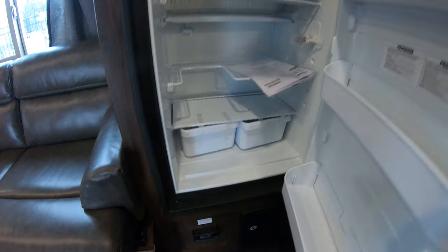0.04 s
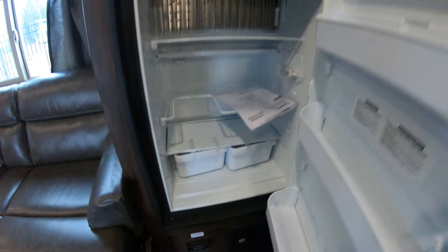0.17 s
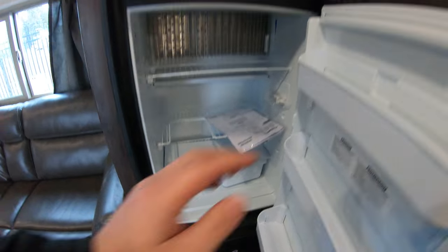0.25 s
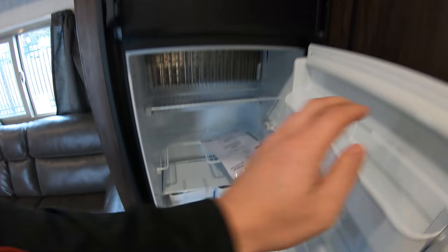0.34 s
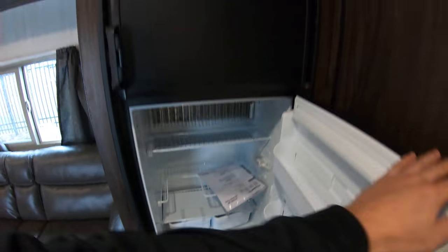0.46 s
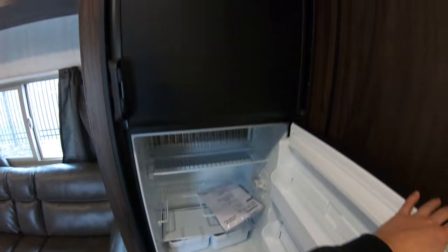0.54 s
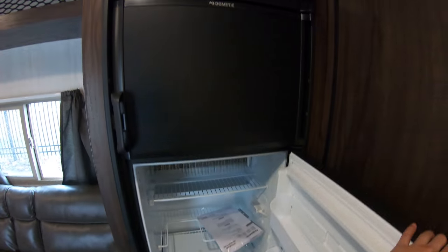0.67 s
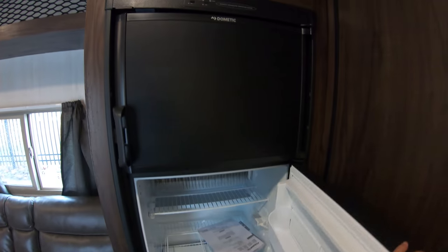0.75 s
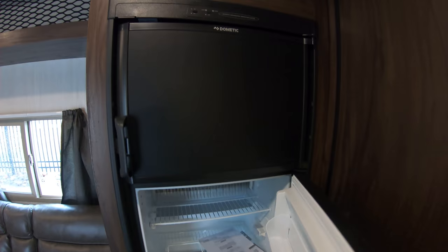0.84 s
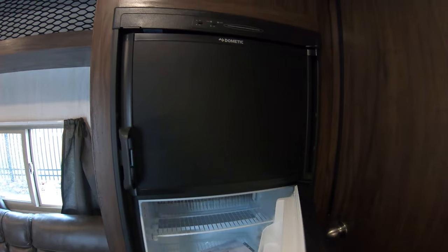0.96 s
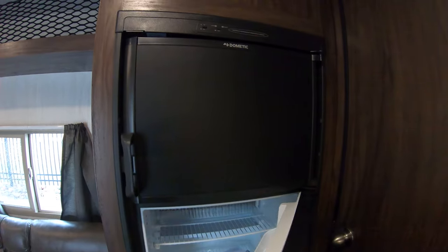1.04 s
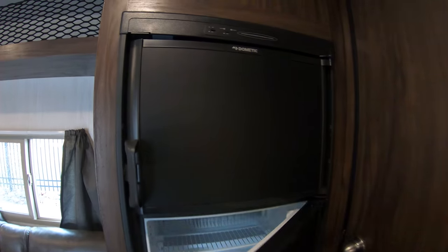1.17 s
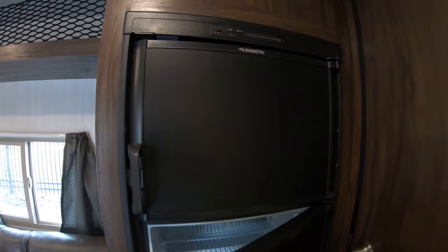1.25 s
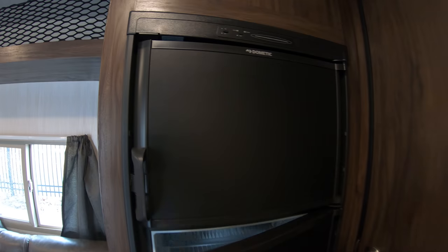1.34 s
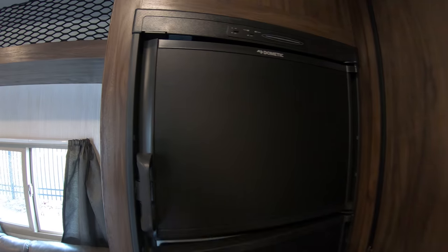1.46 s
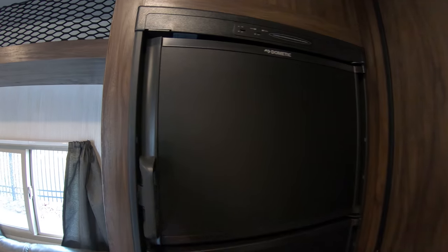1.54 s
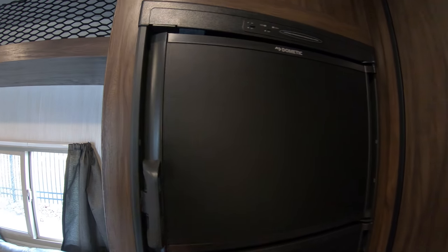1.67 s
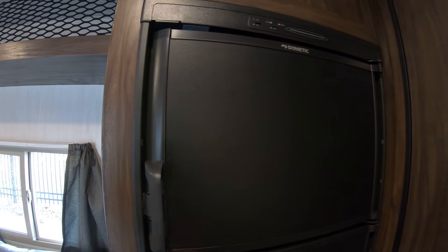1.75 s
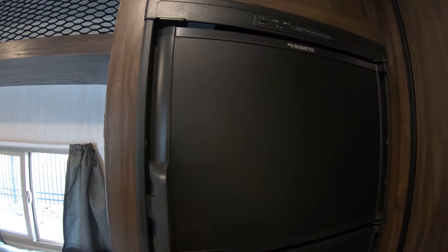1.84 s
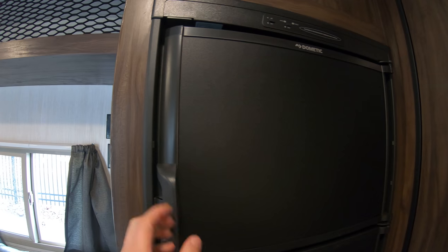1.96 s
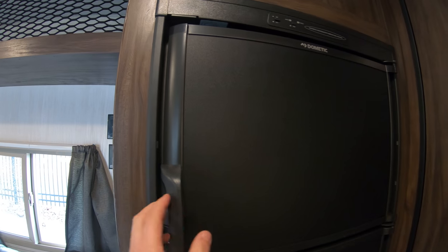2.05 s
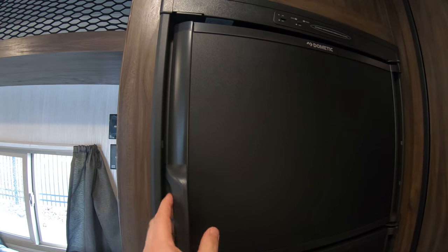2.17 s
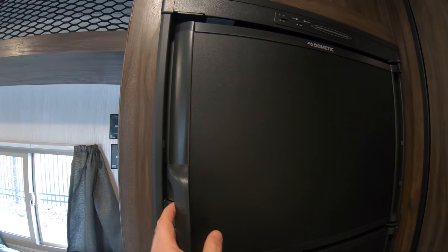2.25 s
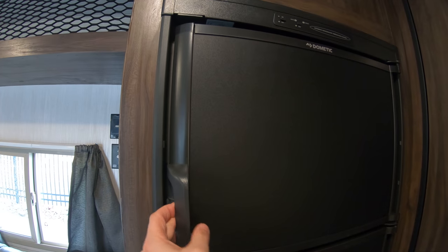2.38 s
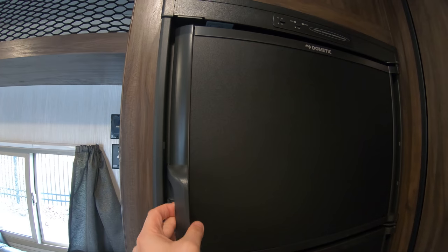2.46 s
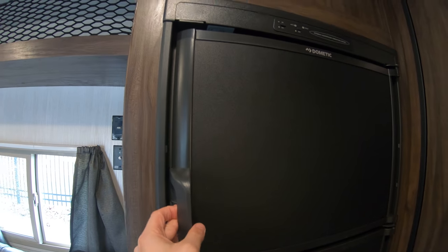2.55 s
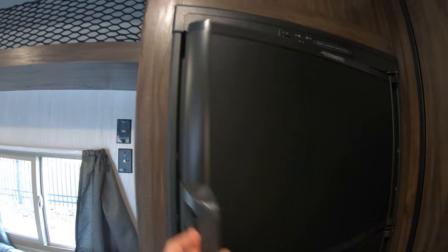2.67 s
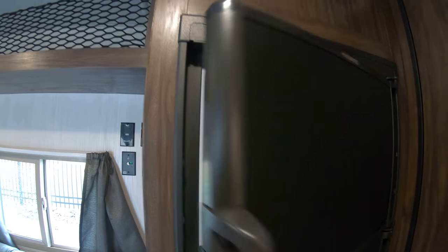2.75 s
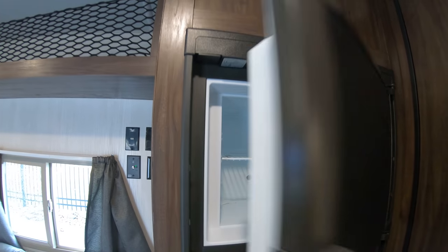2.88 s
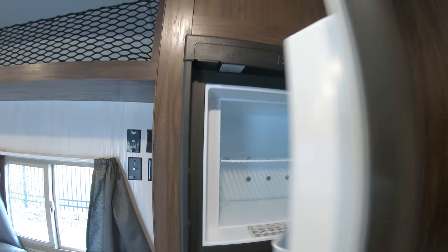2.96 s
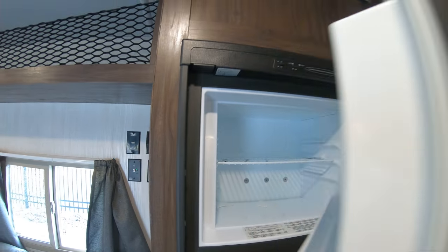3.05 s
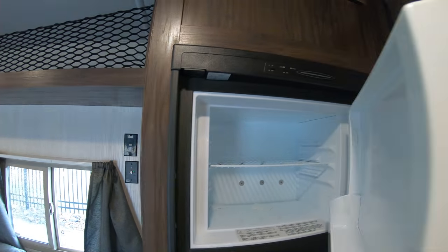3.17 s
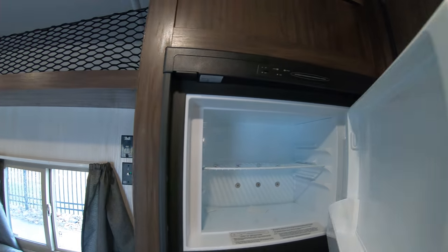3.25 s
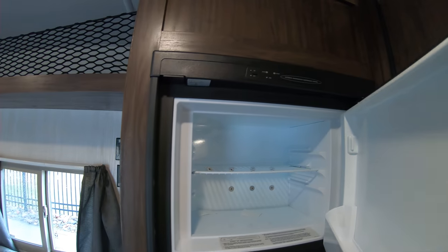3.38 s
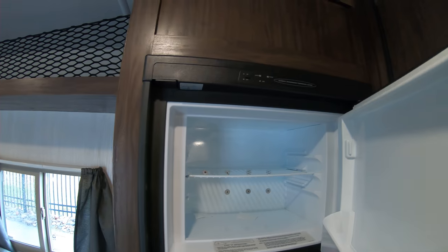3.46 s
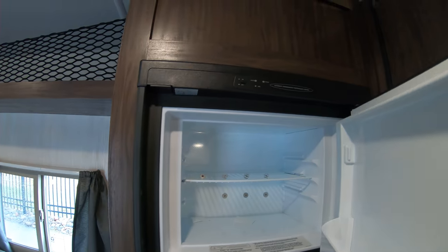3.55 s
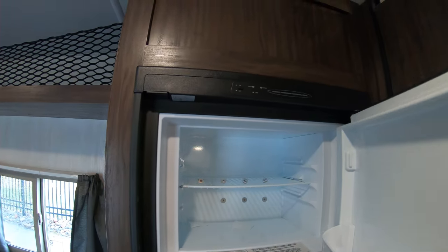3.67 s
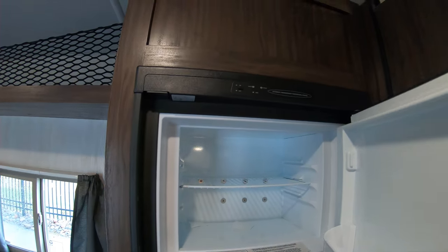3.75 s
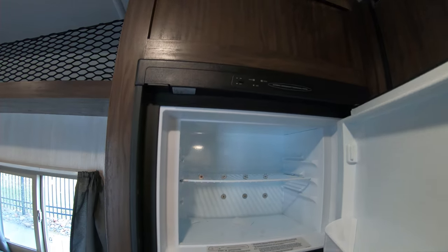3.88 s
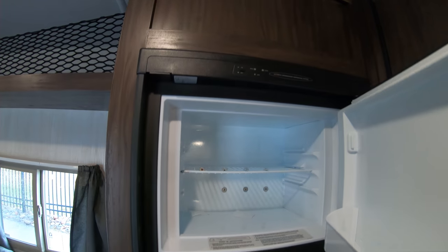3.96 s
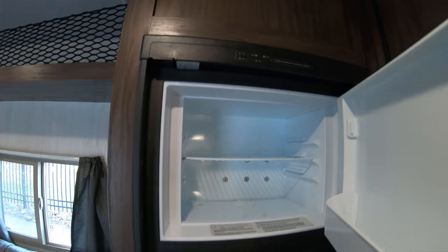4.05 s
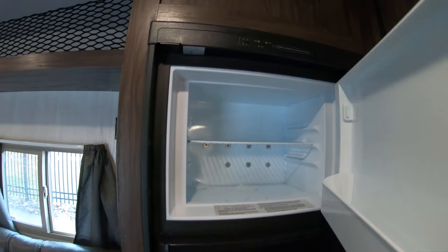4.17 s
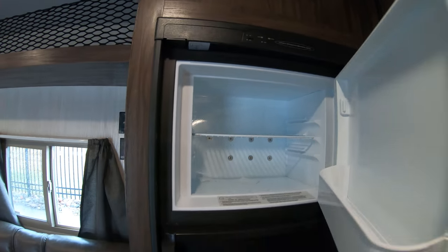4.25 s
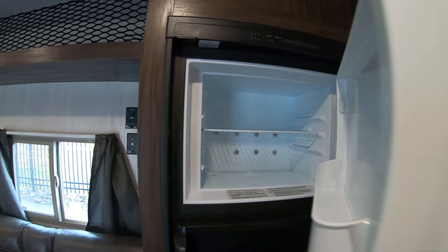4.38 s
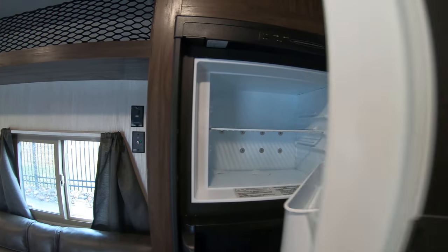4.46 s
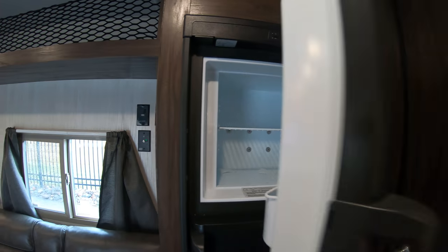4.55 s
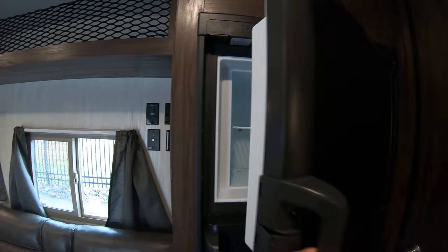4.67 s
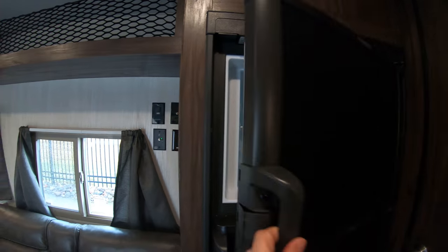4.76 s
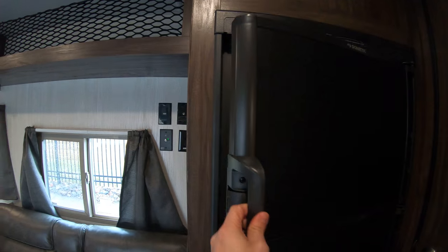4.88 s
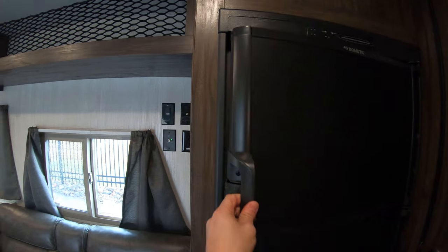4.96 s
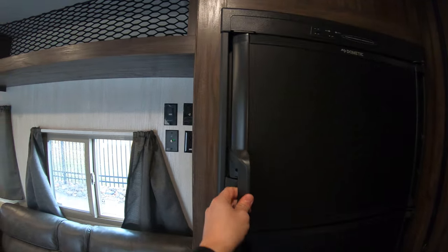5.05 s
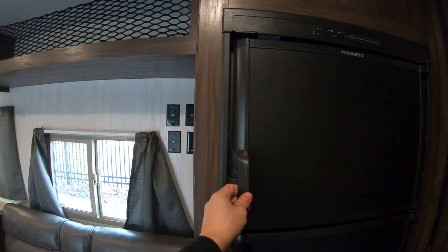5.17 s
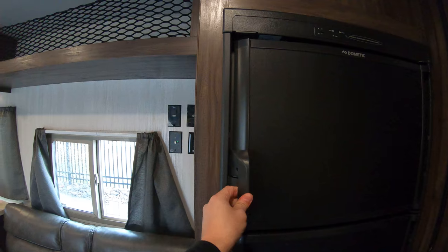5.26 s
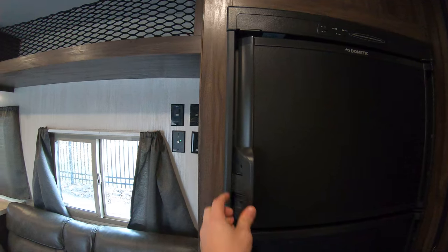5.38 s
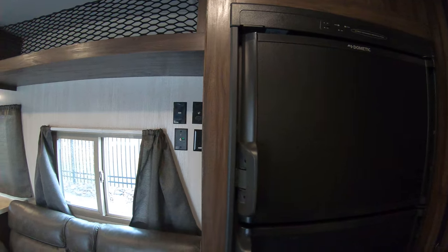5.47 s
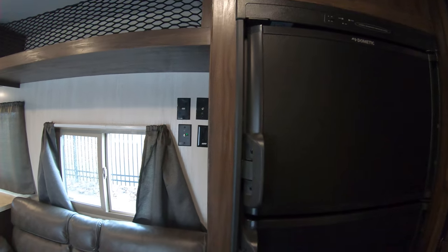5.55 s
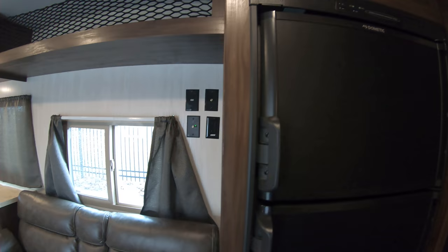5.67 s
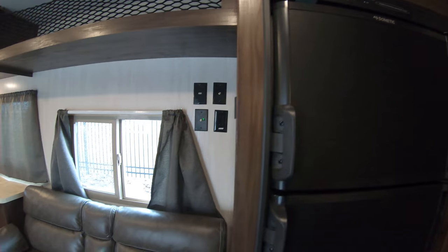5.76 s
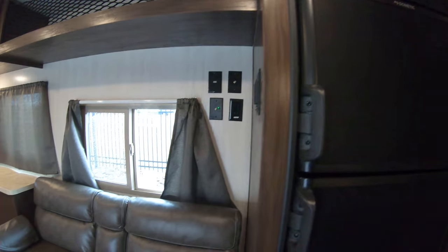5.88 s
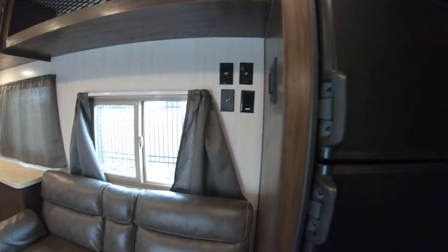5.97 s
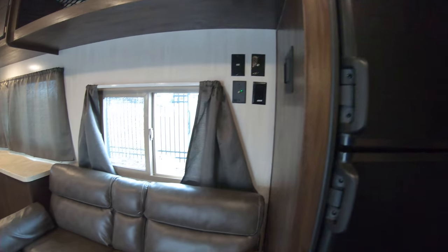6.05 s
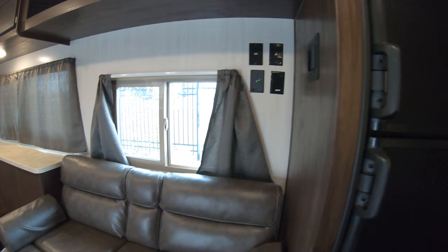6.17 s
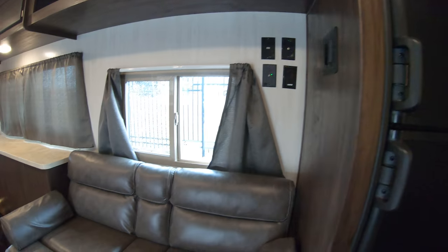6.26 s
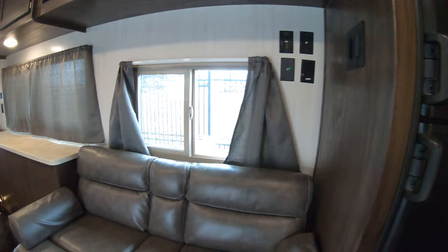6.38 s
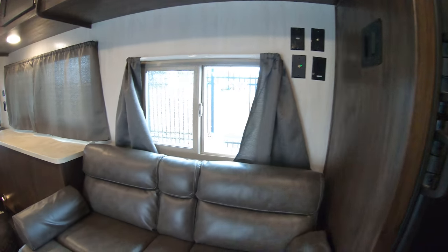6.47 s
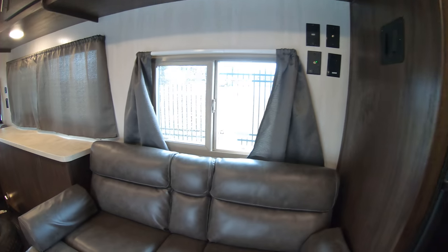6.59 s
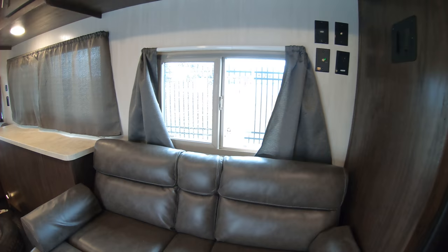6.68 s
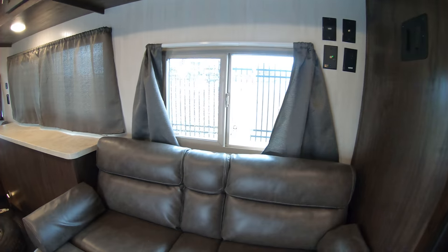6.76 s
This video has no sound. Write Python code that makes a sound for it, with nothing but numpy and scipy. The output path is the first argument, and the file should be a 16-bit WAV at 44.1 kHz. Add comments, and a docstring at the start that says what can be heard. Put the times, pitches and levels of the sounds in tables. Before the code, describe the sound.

In a small panelled camper, a fridge door thuds shut with a rattle, then a freezer door clicks open and knocks shut over low engine rumble.

```python
"""Inside a parked camper, in a small panelled room, the door of a built-in refrigerator is swung shut.
The freezer door above it is unlatched, pulled off its gasket and pushed shut again. Each closing is noise
blows, ringing modes and a low thump; clicks and rubs are shaped noise with a resonance. Outside, an engine
of summed orders speeds up under a noise rumble; sleeves rustle near the microphone over a faint whine."""
import sys
import numpy as np
from scipy import signal
from scipy.fft import rfft, irfft, next_fast_len
from scipy.io import wavfile
from scipy.ndimage import uniform_filter1d, minimum_filter1d, map_coordinates

SR = 44100
rng = np.random.default_rng(int(sys.argv[2]) if len(sys.argv) > 2 else 0)


def master(y):
    """Save y as 16-bit WAV."""
    cut = np.clip(np.atleast_2d(y).T, -1, 1)
    pcm = np.round(cut * 32767)  # scale
    wavfile.write(sys.argv[1], SR, pcm.astype(np.int16))


N = 300850

# rumble from outdoors: (frequency [Hz], density [dB per Hz])
RUMBLE_SPECTRUM = [(20, -1.5), (42, -0.5), (60, 1), (90, 2.5), (140, -3), (175, -6), (230, -13), (300, -26),
                   (400, -30), (550, -75.5), (900, -109.5)]
# swells of the rumble: (time of peak [s], level [dB], half-width [s])
RUMBLE_SURGES = [(.6, -50.5, 0.15), (2.0, -50, 0.48), (3.65, -45, 0.54), (6.4, -43.5, 0.45)]
RUMBLE_DB = -44  # level between the swells, before it wavers
# hiss of the room: (frequency [Hz], density [dB per Hz])
HISS_SPECTRUM = [(200, -5), (470, 11), (560, -2), (720, 11), (1000, 1), (1100, -4), (1250, 4), (1600, 3.5),
                 (2400, 1), (4200, -4.5), (6300, -1), (7500, -11.5), (9500, -23.5), (15000, -38)]
# faint electric whine that comes and goes: (start [s], end [s], level [dB])
WHINE_SPANS = [(.1, 0.96, -70), (1.12, 3.302, -66), (3.698, 6.994, -74)]
WHINE_HZ = 2001
# thin hums: (frequency [Hz], level [dB], width of the phase wander [Hz])
HUM_TONES = [(84.9, -46, 2.162), (136.7, -46.5, 3), (6320, -76, 36)]
# thin airy tones: (start [s], end [s], frequency [Hz], level [dB])
AIRY_TONES = [(1.9, 3.0, 1232, -73), (5.35, 6.35, 1176, -73)]

# loudness of the engine outside, before its offset and fade-in: (time [s], level [dB])
ENGINE_LEVEL = [(3.2, -37.5), (3.57, -31.5), (3.96, -36), (5.1, -31.5), (5.68, -36), (6.31, -37.5),
                (6.82, -37.5)]
# engine orders, before the cabin: (multiple of the cycle rate, level [dB])
ENGINE_ORDERS = [(3, -22), (4, -20), (5, -5), (6, -16), (7, -18.5), (8, -4.5), (9, -7), (10, -27.5),
                 (11, -16), (12, -18.5), (14, -22), (15, -25.5), (17, -27.5)]
# how the cabin passes a tone from outside: (frequency [Hz], gain [dB])
CABIN_RESPONSE = [(35, -8), (57, 4), (70, -3), (76, 0), (90, -0.5), (120, 1.5), (150, -1.5), (260, -1)]
# the engine speeds up once, along an S-curve: cycles per second before and after, middle, time constant
IDLE_HZ, RUNNING_HZ, REV_S, REV_TAU_S = 8.2, 15.05, 3.46, .29
ENGINE_DB, ENGINE_IN_S, ENGINE_IN_DB_PER_S = -0.5, 3.26, 45.5  # offset; end and slope of its fade-in

# arm movements that rustle a sleeve: (time of peak [s], level [dB], half-width [s])
ARM_REACHES = [(.72, -63.5, 0.52), (2.9, -66, 0.54), (4.65, -64.5, 0.3), (5.87, -66, .08),
               (6.22, -61.5, 0.15), (6.57, -57.5, 0.27)]
SLEEVE_REST_DB = -73  # rustle between the movements
# rustling sleeve: (frequency [Hz], density [dB per Hz])
CLOTH_SPECTRUM = [(300, -2.5), (1500, 3.5), (4000, 4.5), (6000, 9), (7200, 3.5), (8500, -8), (10000, -22.5),
                  (15000, -38.5)]
# soft bumps of a door being handled: (time [s], level [dB], frequency [Hz], decay by 60 dB [s])
DOOR_BUMPS = [(0.637, -29, 124, 0.28), (1.325, -22.5, 84, 0.24), (1.331, -49, 281, 0.22),
              (2.061, -51.5, 374, 0.22), (2.299, -40, 90.6, 0.69), (2.665, -28.5, 41.5, 0.68),
              (5.173, -33.5, 803, 0.064), (6.269, -36, 237, 0.19)]
SQUEAK_S, SQUEAK_WIDTH_S, SQUEAK_DB = .505, 0.0076, -43.5  # one tiny squeak
SQUEAK_HZ, SQUEAK_RISE_HZ, SQUEAK_JITTER_HZ = 600, 227, 110.4  # its pitch rises with the pressure

# gasket and hand rubbing on the doors:
# (time of peak [s], level [dB], swell [s], resonance [Hz], resonance gain [dB])
DOOR_RUBS = [(1.332, -52.5, .012, 5300, 7), (1.391, -54, 0.011, 5100, 2), (1.606, -45.5, .03, 2360, 6.5),
             (2.06, -40.5, 0.01, 5800, 14), (2.092, -45.5, 0.013, 2600, 14),
             (2.294, -50.5, 0.0097, 1580, 15), (2.66, -44.5, 0.01, 5400, -2), (2.802, -57.5, .016, 5000, 0),
             (2.882, -58.5, 0.021, 5470, 0), (2.95, -48.5, 0.015, 3240, 15),
             (3.136, -55.5, .012, 2940, 12.5), (6.281, -52, 0.012, 2000, 11.5),
             (6.502, -55.5, .014, 5000, 1)]
# rubbed gasket: (frequency [Hz], density [dB per Hz])
RUBBER_SPECTRUM = [(150, -18), (380, -3), (550, -8.5), (780, -1.5), (1100, -7.5), (1450, -1.5),
                   (3000, -7.5), (5800, -2.5), (7000, -9), (8500, -21), (9500, -34.5), (15000, -48.5)]
RUB_FADE = 1.45  # fade time over swell time

# light clicks of handle, latch and hinges:
# (time [s], level [dB], decay by 60 dB [s], resonance [Hz], resonance gain [dB])
PLASTIC_CLICKS = [(.363, -44.5, 0.019, 5700, 14), (.603, -26, 0.046, 5330, 13),
                  (.612, -32.5, 0.06, 1950, -2), (.655, -28, 0.045, 3950, 7),
                  (.912, -36.5, 0.027, 5840, 13), (1.878, -45, .04, 5500, -5),
                  (2.041, -47.5, 0.049, 5800, 7), (2.059, -41.5, 0.046, 2580, 25),
                  (2.101, -40.5, 0.037, 1450, 25), (2.300, -36.5, 0.044, 1920, 17),
                  (2.312, -33.5, 0.031, 1490, 21.5), (2.4646, -37.5, 0.028, 1740, 17),
                  (2.4655, -34.5, 0.016, 4230, 9), (2.6506, -40, 0.034, 5900, 13),
                  (2.676, -35.5, 0.028, 1490, 17.5), (2.711, -47, .025, 5000, -11),
                  (3.089, -39, 0.03, 2980, 15), (5.392, -53.5, 0.048, 5500, 6),
                  (6.687, -40, 0.079, 6000, 8.5)]
# clicked plastic: (frequency [Hz], density [dB per Hz])
PLASTIC_SPECTRUM = [(150, -18.5), (380, 0), (550, -8), (780, -8), (1100, -10.5), (1600, -1), (3500, 0),
                    (5800, 0), (7000, -1.5), (8500, -14), (9500, -26), (15000, -43)]
CLICK_ATTACK_S, CLICK_WET_DB = 0.0018, -5.5  # rise of the snap; the room's share
SLIDE_DB, SLIDE_S = -16.5, 0.0071  # a part slides briefly before it snaps home

# reverberation of the small room: (frequency [Hz], decay by 60 dB [s])
ROOM_DECAY = [(100, 0.47), (400, 0.26), (1000, 0.26), (2000, 0.24), (5500, 0.25), (10000, 0.21)]

# clatter of each door's frame and shelves: (frequency [Hz], density [dB per Hz])
FRIDGE_CLATTER_SPECTRUM = [(100, -14), (250, 5.5), (400, -3.5), (500, -28), (800, -2), (1100, -10),
                           (1300, 3), (3000, 4.5), (5000, 6), (5650, 11), (6500, 0), (8300, -9),
                           (9300, -24), (15000, -46)]
FREEZER_CLATTER_SPECTRUM = [(100, -24), (250, -12), (420, -4), (550, -22), (770, -10), (1130, -25.5),
                            (1350, -1.5), (2200, 0), (3800, -3.5), (5400, 1), (6600, -6.5), (8300, -15.5),
                            (9300, -30.5), (15000, -50.5)]
# ringing of the shelves and latch: (frequency [Hz], level [dB], decay by 60 dB [s])
FRIDGE_RING_MODES = [(758, -56, 0.084), (1447, -60, 0.11), (1550, -30, 0.23), (2280, -25.5, 0.252),
                     (2320, -49.5, 0.32), (3890, -23, 0.21), (3910, -33.5, 0.14), (4640, -32.5, 0.12),
                     (4770, -35, 0.17), (5340, -26.5, 0.257), (5450, -33, .25), (5540, -23, 0.22),
                     (5790, -22.5, 0.13)]
FREEZER_RING_MODES = [(735, -32.5, 0.063), (1330, -52, 0.15), (1425, -13.5, 0.053), (1463, -26, 0.12),
                      (1546, -26.5, 0.16), (1970, -37, 0.18), (2610, -37, 0.32), (2790, -49, 0.46),
                      (2920, -33, 0.28), (3590, -21, 0.063), (4940, -47, 0.15), (5340, -27, 0.1),
                      (5430, -22.5, 0.17)]
# thump of the door slab and the air shut in behind it: (frequency [Hz], level [dB], decay by 60 dB [s])
FRIDGE_THUMP_MODES = [(30.2, -8, 0.38), (61.4, -9.5, 0.27), (119.4, -14.5, 0.3), (148.6, -15, 0.29),
                      (223.5, -23, 0.193), (255.5, -33, 0.25), (395.5, -32.5, 0.25)]
FREEZER_THUMP_MODES = [(69.5, -4, 0.14), (91.3, -1, 0.1), (114.1, -5.5, 0.19), (234, -39, 0.19),
                       (329, -41, .2), (410, -41, 0.23)]
# stages of a closing (latch touches, latch starts up its catch, door lands): (time [s], level [dB])
FRIDGE_STAGES = [(1.665, -36.5), (1.692, -30), (1.7035, -15.5)]
FREEZER_STAGES = [(5.1445, -51.5), (5.1735, -37), (5.2015, -12)]
LATCH_T60_S, RIDE_GROWS_DB = .11, 4.5  # the latch rides up in three jerks, each louder than the last
LANDING_T60_S, REBOUND_S = 0.056, 0.012  # the landed door chatters against its catch

TOP_HZ = 15500  # nothing is kept from here up


def amp(db):
    """Decibels to gain."""
    return 10 ** (np.asarray(db) / 20)


def unit(x):
    """Scale to rms 1."""
    return x / np.sqrt(np.mean(x ** 2) + 1e-20)


def along(points, hz):
    """Read (frequency [Hz], value) points on a log frequency axis."""
    point_hz, values = np.transpose(points)
    return np.interp(np.log(hz + 1), np.log(point_hz), values)


def seconds(size):
    """Time axis of so many samples."""
    return np.arange(size) / SR


def wobble(rate):
    """A smooth random curve through rate knots a second."""
    knots = rng.standard_normal(4096)
    steps = np.arange(0, N / SR * rate + 1, 1 / 8)
    curve = map_coordinates(knots, [steps], mode="wrap")
    return np.interp(seconds(N) * rate, steps, curve)


def swells(rows):
    """Gain over time: one bell for each (time of peak [s], level [dB], half-width [s])."""
    t = seconds(N)
    return sum(amp(db) * np.exp(-((t - s) / width) ** 2) for s, db, width in rows)


def arch(start, end):
    """A gain that rises quickly after start, rounds over near 1 and is gone by end."""
    progress = np.clip((seconds(N) - start) / (end - start), 0, 1)
    return np.sqrt(np.abs(np.sin(np.pi * progress)))


def noise(spectrum, size, ring_hz=1000, ring_db=0):
    """Noise of rms 1 with a spectrum and one resonance on top."""
    m = next_fast_len(size)
    hz = np.fft.rfftfreq(m, 1 / SR)
    resonance_db = ring_db / (1 + ((hz / ring_hz - 1) / .11) ** 2)
    shaped = rfft(rng.standard_normal(m)) * amp(along(spectrum, hz) + resonance_db)
    return unit(irfft(shaped, m)[:size])


def decay(t, t60, attack):
    """Envelope of something struck: a short rise, then a fall of 60 dB in t60 seconds."""
    return amp(-60 * t / t60) * (1 - np.exp(-t / attack))


def ring(modes, attack):
    """Damped sines, all set off by one blow."""
    t = seconds(SR)
    return sum(amp(db) * decay(t, t60, attack) * np.sin(2 * np.pi * hz * t) for hz, db, t60 in modes)


def add(track, s, x):
    """Mix x into the track from time s on."""
    start = max(round(s * SR), 0)
    track[start:start + len(x)] += x[:max(len(track) - start, 0)]


def room(x, wet_db):
    """Close walls answer within milliseconds; each use draws its own dense tail."""
    hz, t, bands = signal.stft(rng.standard_normal(SR // 2), SR, nperseg=256)
    fading = bands * amp(-60 * t / along(ROOM_DECAY, hz)[:, None])
    tail = signal.istft(fading, SR, nperseg=256)[1]
    tail *= 1 - np.exp(-seconds(len(tail)) / 0.0038)
    response = amp(wet_db) * tail / np.linalg.norm(tail)
    response[0] += 1  # the direct sound
    return signal.fftconvolve(x, response)


def background():
    """Outdoor rumble and room hiss are shaped noise; whine, hums and airy tones are wavering sines."""
    t = seconds(N)
    rumble_gain = (amp(RUMBLE_DB) + swells(RUMBLE_SURGES)) * amp(1.75 * wobble(5.73))
    out = rumble_gain * noise(RUMBLE_SPECTRUM, N)
    out += amp(-64) * noise(HISS_SPECTRUM, N)
    whine_gain = sum(amp(db) * arch(start, end) for start, end, db in WHINE_SPANS)
    out += whine_gain * np.sin(2 * np.pi * WHINE_HZ * t + .3 * wobble(7.3))
    for hz, db, width_hz in HUM_TONES:
        out += amp(db + 0.87 * wobble(2)) * np.sin(2 * np.pi * hz * t + wobble(2 * width_hz))
    for start, end, hz, db in AIRY_TONES:
        phase = 2 * np.pi * hz * t
        airy = wobble(45) * np.sin(phase) + wobble(45) * np.cos(phase)  # a narrow band of noise
        out += amp(db) * arch(start, end) * airy
    return out


def engine():
    """Low engine orders come through the walls and swell as they cross the cabin's resonances."""
    t = seconds(N)
    cycle_hz = IDLE_HZ + (RUNNING_HZ - IDLE_HZ) / (1 + np.exp((REV_S - t) / REV_TAU_S))
    phase = 2 * np.pi * np.cumsum(cycle_hz) / SR
    level_s, level_db = np.transpose(ENGINE_LEVEL)
    fade_in_db = -ENGINE_IN_DB_PER_S * np.maximum(ENGINE_IN_S - t, 0)
    loudness_db = ENGINE_DB + np.interp(t, level_s, level_db) + fade_in_db
    out = np.zeros(N)
    for order, order_db in ENGINE_ORDERS:
        waver_db = 1.4 * wobble(4)
        cabin_db = along(CABIN_RESPONSE, order * cycle_hz)
        tone = np.sin(order * phase + 0.15 * wobble(6) + rng.uniform(0, 2 * np.pi))
        out += amp(order_db + waver_db + cabin_db) * tone
    return np.sqrt(2) * amp(loudness_db) * out


def sleeves():
    """Cloth rustles near the microphone: flickering noise that swells with each arm movement."""
    rustle = np.hypot(amp(SLEEVE_REST_DB), swells(ARM_REACHES))
    return rustle * amp(1.1 * wobble(27)) * noise(CLOTH_SPECTRUM, N)


def squeak():
    """One tiny squeak: two partials whose pitch rises and falls with the pressure."""
    pressure = np.exp(-((seconds(N) - SQUEAK_S) / SQUEAK_WIDTH_S) ** 2)
    pitch_hz = SQUEAK_HZ + SQUEAK_RISE_HZ * pressure + SQUEAK_JITTER_HZ * wobble(500)
    phase = 2 * np.pi * np.cumsum(pitch_hz) / SR
    return amp(SQUEAK_DB) * pressure * (np.sin(phase) + amp(-9.5) * np.sin(2.3 * phase))


def bumps():
    """Dull bumps of the handled doors, each a single damped mode."""
    out = np.zeros(N)
    for s, db, hz, t60 in DOOR_BUMPS:
        add(out, s, ring([(hz, db, t60)], attack=0.0025))
    return out


def rubs():
    """Rubber and skin slip in many tiny jerks that swell and fade."""
    out, t = np.zeros(N), seconds(SR // 2) - 1 / 4
    jerks = unit(amp(1.4 * wobble(600)))
    for s, db, swell, ring_hz, ring_db in DOOR_RUBS:
        stroke = np.exp(-np.abs(t) / np.where(t < 0, swell, RUB_FADE * swell))
        add(out, s + t[0], amp(db) * stroke * noise(RUBBER_SPECTRUM, len(t), ring_hz, ring_db))
    return room(out * jerks, wet_db=-6.5)[:N]


def clicks():
    """Small plastic contacts: a short slide, then a snap with a resonance of the part that is touched."""
    out, t = np.zeros(N), seconds(SR // 4) - 1 / 8
    slide = amp(SLIDE_DB) * np.exp(-np.abs(t) / SLIDE_S)
    for s, db, t60, ring_hz, ring_db in PLASTIC_CLICKS:
        shape = slide + decay(np.maximum(t, 0), t60, CLICK_ATTACK_S)
        click = amp(db) * shape * noise(PLASTIC_SPECTRUM, len(t), ring_hz, ring_db)
        add(out, s + t[0], room(click, CLICK_WET_DB))
    return out


def contacts(stages, loss_db):
    """Blows of one closing as (time [s], level [dB], decay [s]): touch, latch jerks, landing, rebounds."""
    (touch, touch_db), (ride, ride_db), (landing, landing_db) = stages
    blows = [(touch, touch_db, LATCH_T60_S)]
    for k, s in enumerate(np.linspace(ride, landing, 3, endpoint=False)):
        blows.append((s, ride_db + RIDE_GROWS_DB * k, LATCH_T60_S))
    for k in range(5):  # the landing and four fading rebounds
        blows.append((landing + REBOUND_S * k, landing_db - loss_db * k, LANDING_T60_S))
    return blows


def closing(stages, clatter, shelves, thump, loss_db, lead, thump_attack, wet_db):
    """The latch rides up its catch, the door lands with a thump, and its fittings rattle on."""
    blows, t = np.zeros(N), seconds(SR // 8)
    for s, db, t60 in contacts(stages, loss_db):
        add(blows, s, amp(db) * decay(t, t60, 0.0016) * noise(clatter, len(t)))
    # loose parts touch many times within each blow
    chatter = unit(amp(2.0 * wobble(700)))
    out = room(blows * chatter, wet_db)[:N]
    landing = stages[-1][0]
    add(out, landing + .001, ring(shelves, attack=0.00068))
    # the soft gasket meets the cabinet just before the hard parts do
    add(out, landing - lead, ring(thump, thump_attack))
    return out


def scene():
    """The camper around the doors, the small noises of handling them, and both doors shutting."""
    surroundings = background() + engine()
    handling = sleeves() + squeak() + bumps() + rubs() + clicks()
    fridge = closing(FRIDGE_STAGES, FRIDGE_CLATTER_SPECTRUM, FRIDGE_RING_MODES, FRIDGE_THUMP_MODES,
                     loss_db=4.0, lead=.005, thump_attack=0.016, wet_db=0.5)
    freezer = closing(FREEZER_STAGES, FREEZER_CLATTER_SPECTRUM, FREEZER_RING_MODES, FREEZER_THUMP_MODES,
                      loss_db=8.0, lead=.0035, thump_attack=0.011, wet_db=-1.0)
    return (surroundings + handling + fridge + freezer)[None]


def record(dry):
    """A limiter behind the microphone holds down the highest peaks; a steep cut ends the treble."""
    needed = 0.76 / np.maximum(np.abs(dry), 0.76)
    gain = uniform_filter1d(minimum_filter1d(needed, size=200), size=200)
    m = next_fast_len(N + SR // 4)
    kept = np.fft.rfftfreq(m, 1 / SR) < TOP_HZ
    return irfft(rfft(dry * gain, m) * kept, m)[:, :N]


dry = scene()
out = record(dry)
master(out)
```